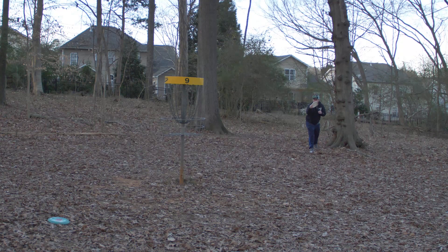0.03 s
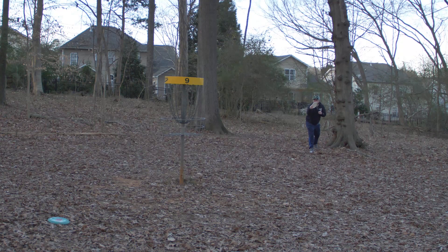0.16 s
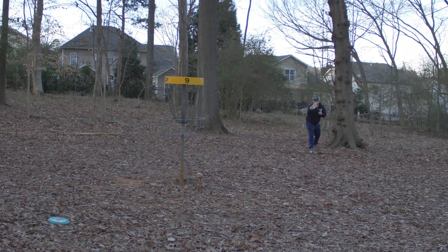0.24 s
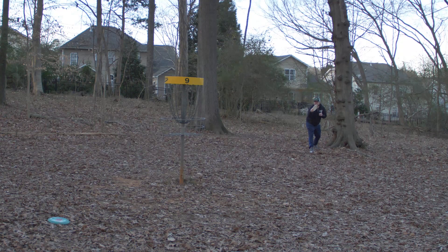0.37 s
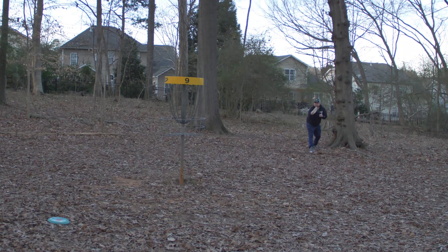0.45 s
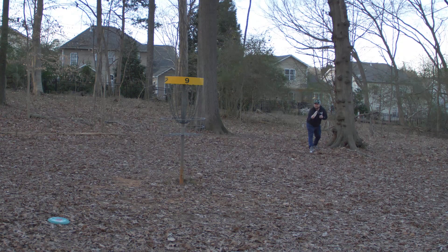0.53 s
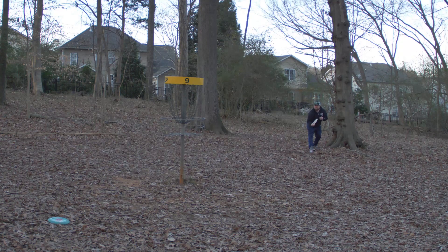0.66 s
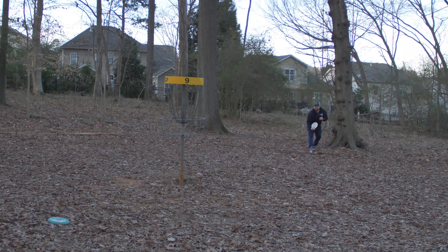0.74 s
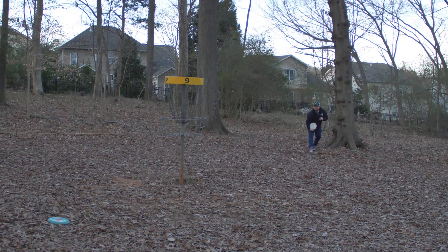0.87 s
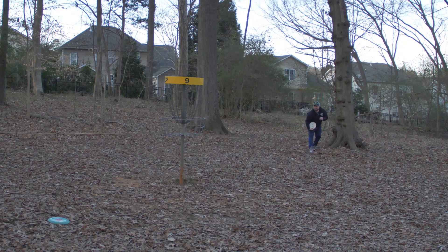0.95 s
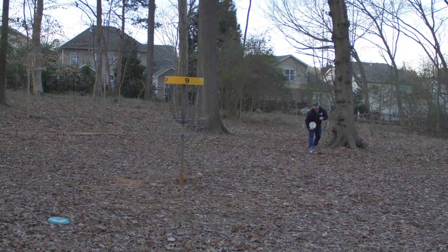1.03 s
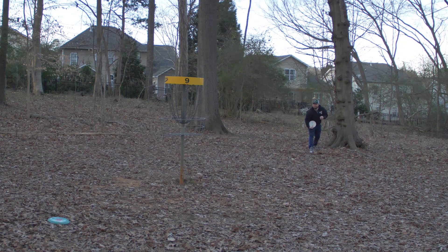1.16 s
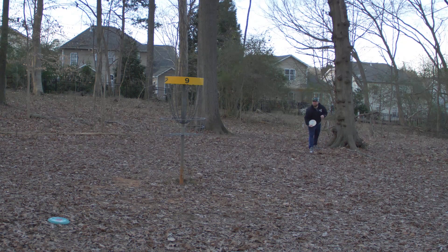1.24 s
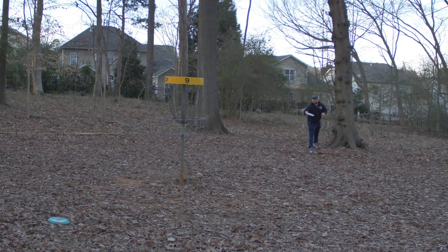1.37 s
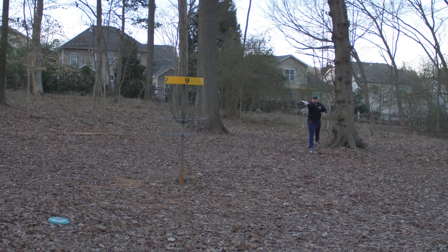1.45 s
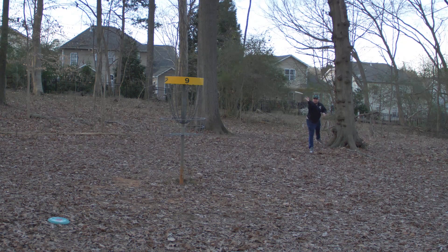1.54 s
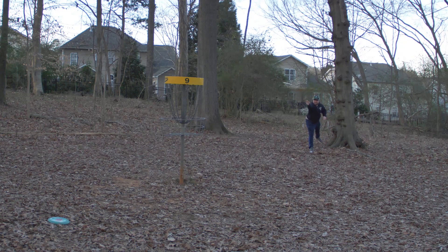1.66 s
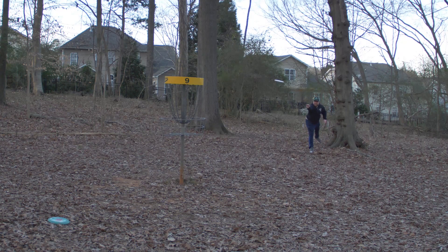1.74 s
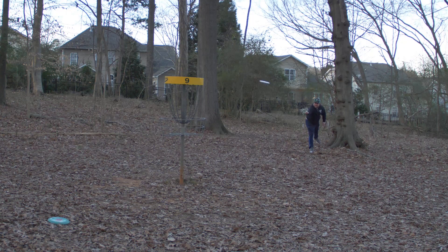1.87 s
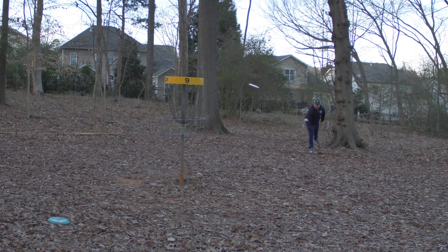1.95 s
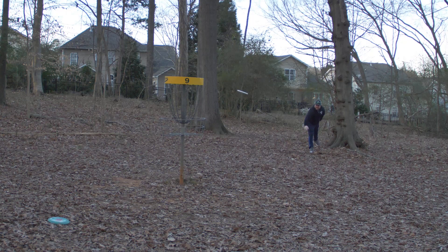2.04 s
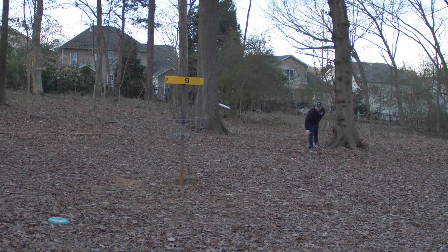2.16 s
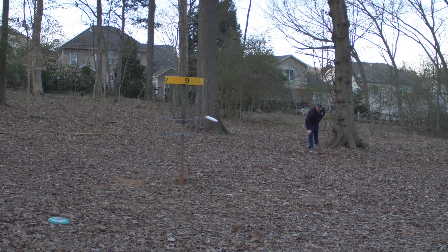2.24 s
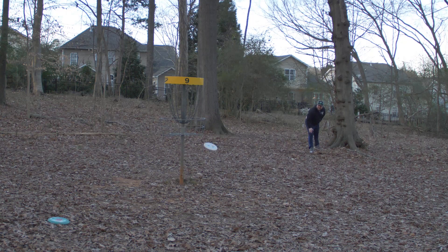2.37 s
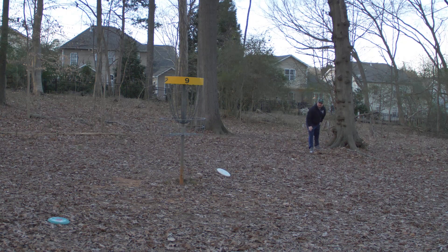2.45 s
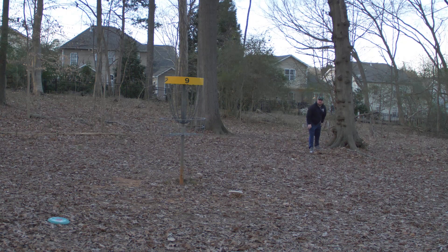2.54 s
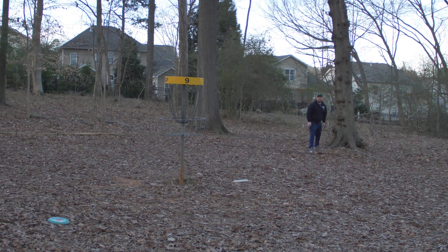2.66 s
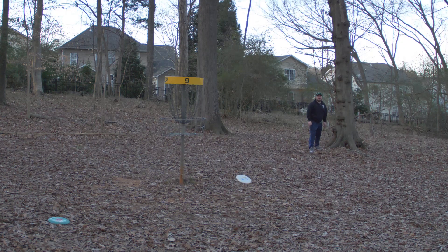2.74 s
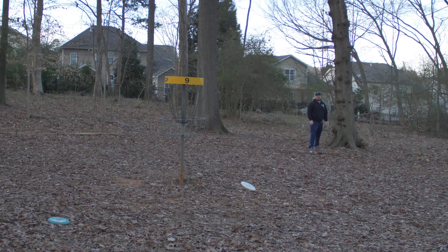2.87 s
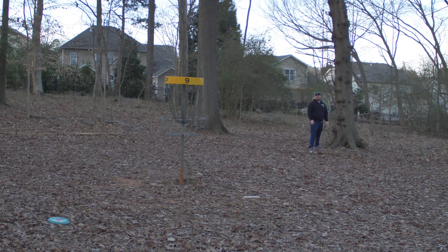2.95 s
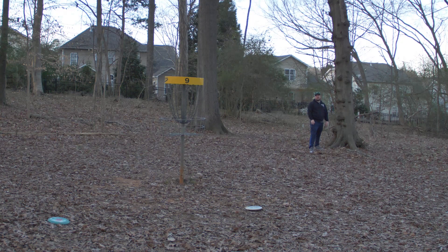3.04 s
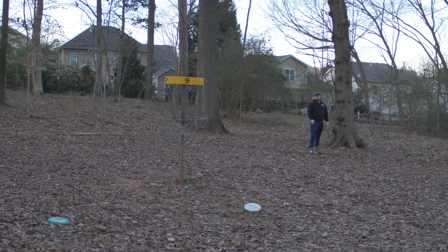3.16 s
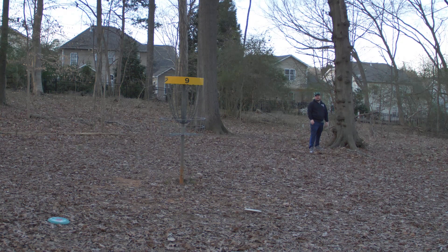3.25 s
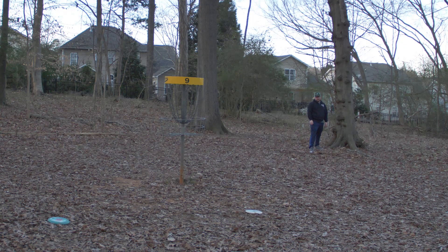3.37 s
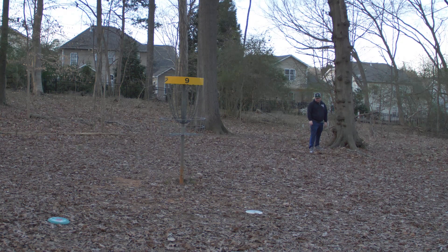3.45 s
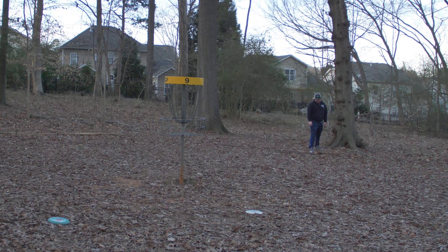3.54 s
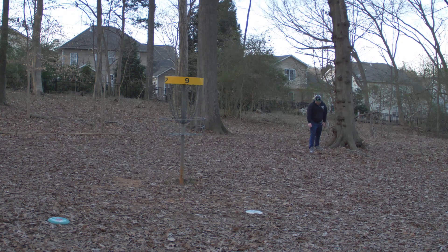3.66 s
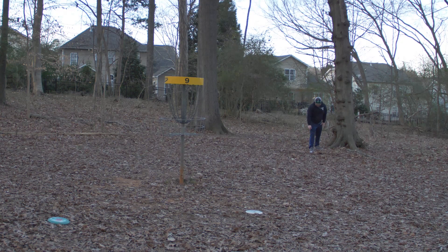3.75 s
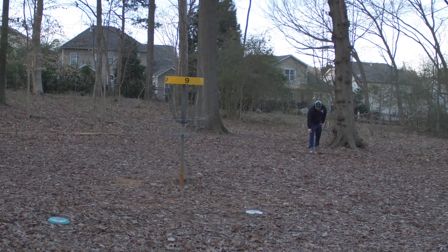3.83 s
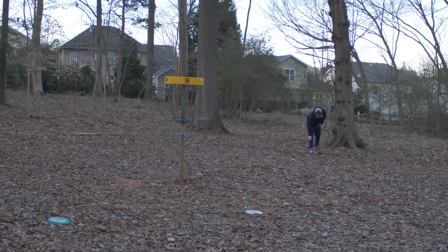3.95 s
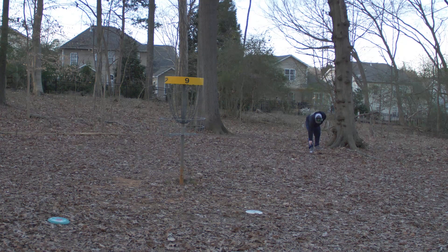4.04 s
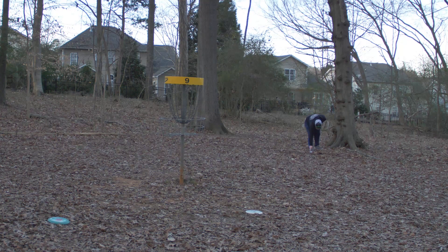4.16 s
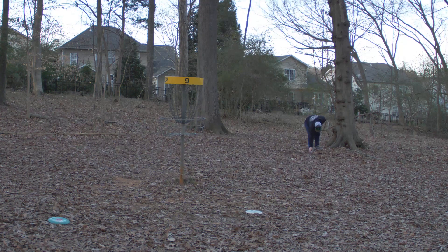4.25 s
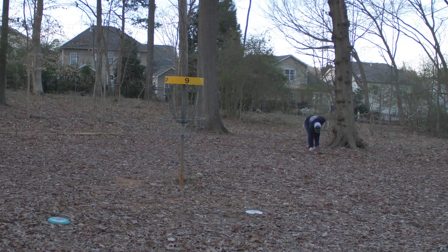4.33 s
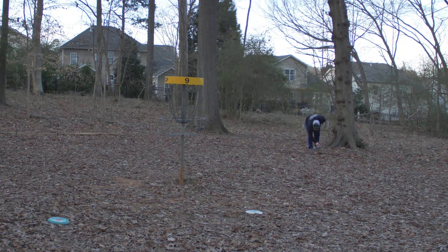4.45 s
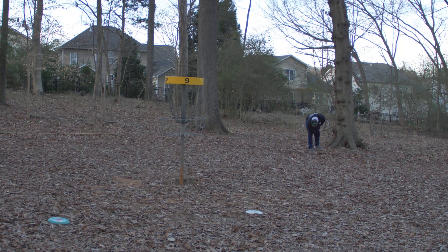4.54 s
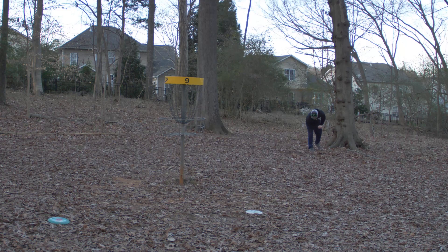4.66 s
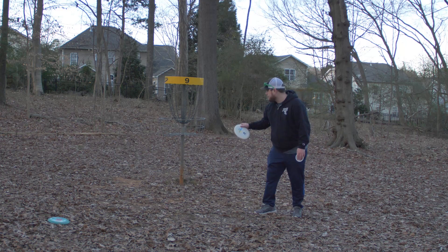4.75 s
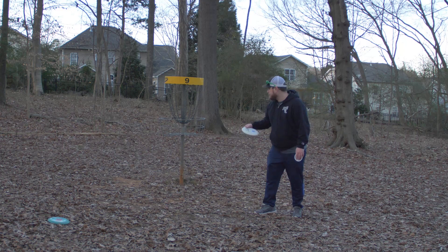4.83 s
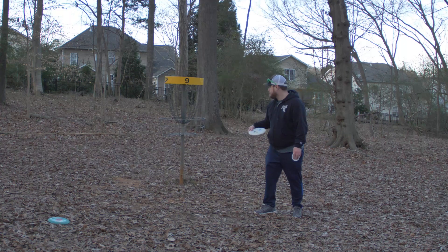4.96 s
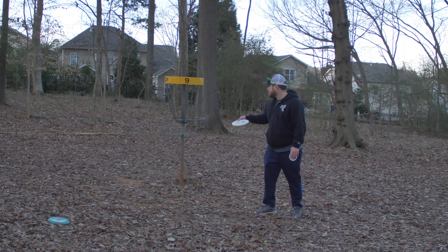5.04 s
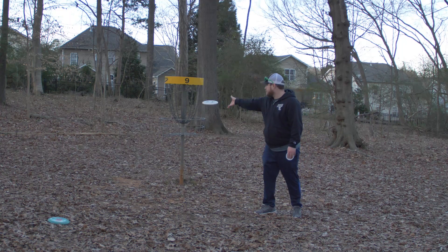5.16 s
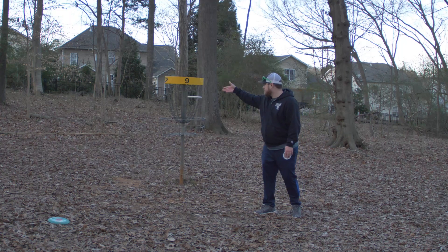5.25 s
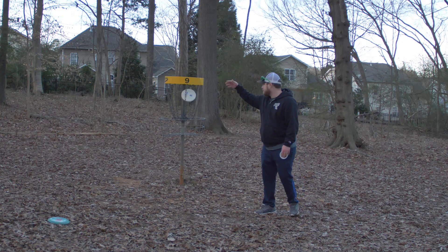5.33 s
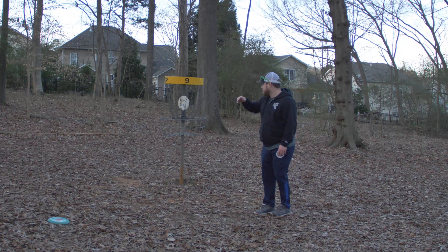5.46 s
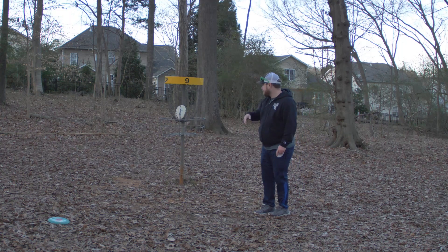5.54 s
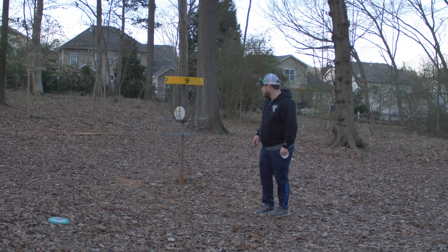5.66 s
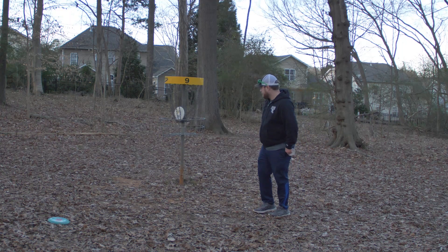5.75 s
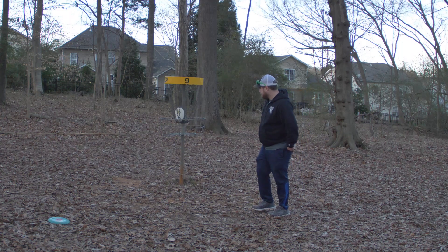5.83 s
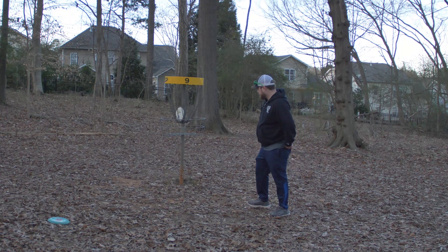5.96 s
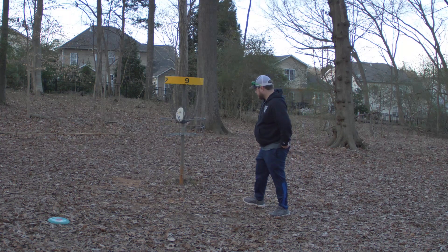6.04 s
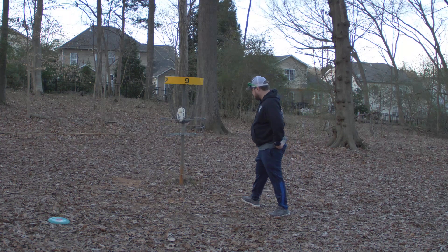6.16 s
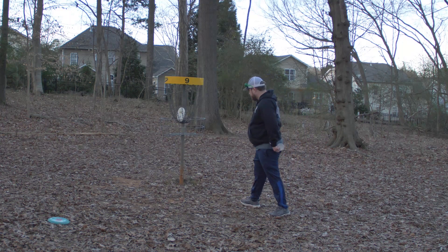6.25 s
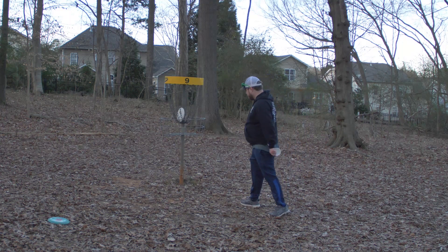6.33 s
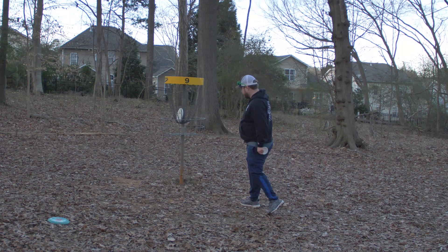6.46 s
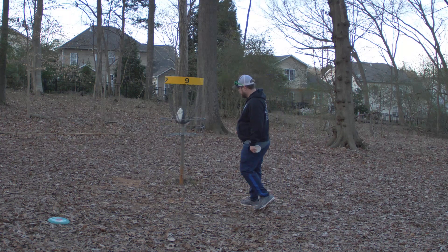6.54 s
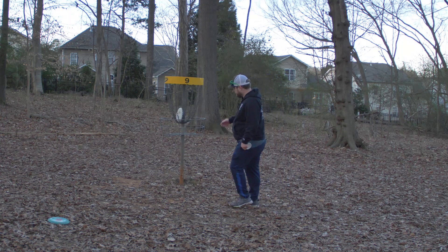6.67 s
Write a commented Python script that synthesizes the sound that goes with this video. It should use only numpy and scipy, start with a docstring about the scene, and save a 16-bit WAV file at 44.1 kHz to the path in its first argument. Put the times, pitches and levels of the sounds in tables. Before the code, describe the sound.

In a quiet wooded suburb with faint far traffic hum, feet stir dry leaves and twigs snap. A thrown disc clangs off a steel basket, chains shiver, and the disc knocks and flops on leaves. After more twig snaps, a second disc crashes much louder into the chains, jingling and clinking to rest. Microphone close to the basket.

```python
"""A suburb hums far off while feet stir dry leaves and twigs snap. A putted disc clangs off a steel disc golf basket,
leaves the chains shivering and bounces away over the ground. A second disc crashes into the chains, which jingle
while it settles. Steel is decaying modes set off by volleys of contacts; leaves are coloured crackle; twigs and
shivering chains are resonated noise or contacts; the disc is short sines with a slap; the hum is coloured noise."""
import sys
import numpy as np
from scipy import signal
from scipy.fft import rfft, irfft
from scipy.io import wavfile
from scipy.ndimage import uniform_filter1d

SR = 44100
rng = np.random.default_rng(int(sys.argv[2]) if len(sys.argv) > 2 else 0)


def wrap_up_sound(samples):
    """Save the sound to the file named by the first command line argument, as 16-bit audio."""
    columns = np.atleast_2d(samples).T
    # keep every value between -1 and 1, then stretch to whole-number steps
    tamed = np.clip(columns, -1, 1)
    steps = np.round(tamed * 32767).astype(np.int16)
    wavfile.write(sys.argv[1], SR, steps)


N = 295470
T = np.arange(N) / SR
BLOCK = 256
RING_T = np.arange(BLOCK * BLOCK) / SR  # time axis of one struck sound, s


def undb(db):
    """Gain of a level in dB."""
    return 10 ** (np.asarray(db) / 20)


def unit(x):
    """Scale to rms 1."""
    return x / np.sqrt(np.mean(x ** 2))


def add(out, s, x):
    """Mix x into out from time s."""
    i = int(s * SR)
    out[i:i + len(x)] += x[:N - i]


def shape(points, hz, tilt_db=0):
    """Gain of a (Hz, dB) spectrum at hz, tilted about 3 kHz by tilt_db per octave."""
    f, db = np.transpose(points)
    octave = np.log2(np.maximum(hz, 1))
    level_db = np.interp(octave, np.log2(f), db)
    return undb(level_db + tilt_db * np.clip(octave - np.log2(3000), -3, 3))


def colour(x, points, tilt_db=0):
    """Give x a spectrum; rms 1."""
    gain = shape(points, np.fft.rfftfreq(len(x), 1 / SR), tilt_db)
    return unit(irfft(rfft(x) * gain, len(x)))


def resonate(x, modes):
    """Pass x through (Hz, width Hz, dB) resonances with steep skirts; rms 1."""
    f = np.fft.rfftfreq(len(x), 1 / SR)
    power = sum(undb(db) ** 2 / (1 + ((f - hz) / width) ** 2) ** 2 for hz, width, db in modes)
    return unit(irfft(rfft(x) * np.sqrt(power), len(x)))


def contacts(rate, spread_db, size):
    """Tiny collisions at random moments, rate a second, of uneven strength."""
    chance = rng.random(size)
    strength = rng.standard_normal(size)
    sign = rng.choice([-1, 1], size)
    return (chance < rate / SR) * sign * undb(spread_db * strength)


def ring(modes, scatter_db=2, detune=0.):
    """Free decay of (Hz, dB, t60 s) modes, starting at rms 1; each strike shares the energy differently."""
    hz, db, t60 = np.transpose(modes)
    gain = undb(db + scatter_db * rng.standard_normal(len(hz)))
    gain = gain / np.sqrt(np.sum(gain ** 2) / 2)
    gain = gain * np.exp(2j * np.pi * rng.random(len(hz)))  # random phase
    hz = hz * (1 + detune * rng.standard_normal(len(hz)))
    pole = 2j * np.pi * hz - np.log(1000) / t60
    # each block of samples starts from the state that the modes have decayed to
    block_start = gain * np.exp(np.outer(RING_T[::BLOCK], pole))
    within_block = np.exp(np.outer(pole, RING_T[:BLOCK]))
    return (block_start @ within_block).imag.ravel()


def burst(t, rise, fade):
    """Quick rise and exponential fade, both time constants in s."""
    return (1 - np.exp(-t / rise)) * np.exp(-t / fade)


def walk(rate):
    """Slow random wander, spread near 1, with rate new targets a second."""
    k = int(SR / rate)
    steps = np.repeat(rng.standard_normal(N // k + 1), k)
    return 1.3 * uniform_filter1d(uniform_filter1d(steps, k), k)[:N]


def arch(start, length, power=1.0):
    """Gain that rises and falls once, as half a sine raised to power."""
    return np.maximum(np.sin(np.pi * np.clip((T - start) / length, 0, 1)), 0) ** power


def run_down(start, rise, length, power, rise_power=1):
    """Gain of a motion that builds up, then is braked to a standstill by friction; power bends the run-down."""
    t = T - start
    build_up = np.sin(np.pi / 2 * np.clip(t / rise, 0, 1)) ** rise_power
    return build_up * np.clip((length - t) / (length - rise), 0, 1) ** power


# spectrum of the far hum: f/Hz, level/dB
HUM_SPECTRUM = [(25, -0.5), (50, -4.5), (85, 1.5), (125, -4), (200, -7.5), (320, -5), (580, -0.5),
                (1100, -4.5), (2000, -16.5), (4000, -30), (5500, -27.5), (11500, -32), (15400, -31)]


def suburb(base_db=-50.5, swell_db=3, swell_s=2.4, swell_length_s=1.94):
    """Far traffic: coloured noise that wavers a little and swells once."""
    db = base_db + swell_db * arch(swell_s, swell_length_s) + 0.47 * walk(7.2)
    return colour(rng.standard_normal(N), HUM_SPECTRUM) * undb(db)


# spectrum of crackling dry leaves: f/Hz, level/dB
LEAF_SPECTRUM = [(300, -7), (1000, 0), (2500, -5.5), (4000, -2), (6000, -3), (8500, -10.5), (10500, -7.5),
                 (13000, -14), (15500, -27.5)]
# a foot presses or turns in the leaves: t/s, length/s, level/dB
FOOTSTEPS = [(.43, .34, -58), (1.166, 0.48, -60), (1.68, .34, -61.5), (4.28, 0.35, -56), (4.64, 0.27, -50),
             (4.793, .6, -59.5), (6.468, 0.18, -43.5)]


def leaves_underfoot(rustle_db=-69):
    """Uneven tiny contacts crackle with the pressure of the feet, over a constant faint rustle."""
    power = undb(rustle_db) ** 2
    for s, length, db in FOOTSTEPS:
        power = power + (undb(db) * arch(s, length, power=0.62)) ** 2
    return colour(contacts(3000, 6, size=N), LEAF_SPECTRUM) * np.sqrt(power)


def trees(x, t60=1.0, echo_db=-21):
    """Trunks and houses scatter a faint, dull echo: x convolved with fading coloured noise."""
    echo_spectrum = [(100, -2.5), (600, -8), (3000, -6), (8000, -1), (15000, -24.5)]  # f/Hz, level/dB
    echo = colour(rng.standard_normal(len(RING_T)), echo_spectrum)
    echo = echo * burst(RING_T, 0.0097, t60 / np.log(1000))
    return undb(echo_db) * signal.fftconvolve(x, echo / np.sqrt(np.sum(echo ** 2)))[:N]


# twigs snapping underfoot: t/s, level/dB, resonance f/Hz
TWIG_SNAPS = [(0.5496, -33.5, 580), (.551, -37, 2800), (.66, -41, 5000), (1.043, -39, 2720),
              (4.342, -36, 6500), (4.434, -41.5, 5000), (4.537, -34, 3600), (4.886, -35.5, 5470),
              (4.954, -40, 6500), (5.105, -30, 4150), (5.283, -34, 6000)]


def twigs():
    """A snap is noise through one broad resonance: a crack that is shorter the higher it is, and a faint tail."""
    out, t = np.zeros(N), RING_T[:8192]
    for s, db, hz in TWIG_SNAPS:
        crack = resonate(rng.standard_normal(len(t)), [(hz, 0.63 * hz, 0)])
        fade = np.exp(-t * hz / 4) + 0.048 * np.exp(-t / 0.014)
        add(out, s, undb(db) * crack * fade)
    return out


# broad resonances of the taut chains: f/Hz, width/Hz, level/dB
TAUT_CHAIN_MODES = [(330, 7.3, 2), (468, 110, -7.5), (860, 180, -1), (1470, 370, -10.5), (1890, 120, -9.5),
                    (2364, 21, -5.5), (2696, 122, 1.5), (3600, 160, 1), (4380, 250, -11), (4800, 310, -10),
                    (5580, 180, -12), (6360, 390, -18), (7240, 220, -19), (9780, 900, -26.5)]


def shiver(start=2.386, level_db=-33, slack_share=.15, taut_s=.14, count=3):
    """Hanging chains chatter finely as the frame is struck, swelling in turn until friction stops them."""
    chatter = 0
    for size in 1 + .012 * np.linspace(-1, 1, count):
        modes = [(hz * size, width, db) for hz, width, db in TAUT_CHAIN_MODES]
        chatter = chatter + resonate(contacts(1800, 2, size=N), modes) * undb(1.2 * walk(8.9))
    strength = run_down(start, rise=0.32, length=1.27, power=1.41, rise_power=1.6)
    # the resonances start low, climb as the chains pull taut, and bend slowly as they sway
    slack = slack_share * np.exp(-np.maximum(T - start, 0) / taut_s)
    read_position = np.cumsum(1 - slack + .006 * walk(5))
    return np.interp(read_position, np.arange(N), unit(chatter)) * undb(level_db) * strength


def rods(count=360, t60_at_2khz=0.63, damping=0.68):
    """The basket's many rods, packed closer at low pitch; higher ones decay faster. Returns Hz and t60 in s."""
    hz = 380 + 13500 * ((np.arange(count) + rng.random(count)) / count) ** 1.6
    t60 = t60_at_2khz * (hz / 2000) ** -damping * np.exp(0.36 * rng.standard_normal(count))
    return hz, t60


# spectrum of steel contacts, which also weights the rods: f/Hz, level/dB
CLATTER_SPECTRUM = [(150, -32), (300, -24), (450, -10), (800, -7.5), (1400, -3.5), (2000, -2.5), (3300, 0),
                    (4100, -2.5), (5400, 1), (7500, -8.5), (10000, -8.5), (11000, -12.5), (13000, -9),
                    (15500, -22.5)]
# strongest modes of the welded frame: f/Hz, level/dB, t60/s
FRAME_MODES = [(567, -4, 0.34), (990, -7.5, .5), (1030, 1, 0.34), (1449, -0.5, .45), (1740, 3, 0.39),
               (1900, 2.5, 0.39), (1916, 0, 0.57), (2090, 0, 0.32), (2346, 6, 0.27), (2901, -4.5, 1),
               (2980, -3, .5), (3182, -3, .5), (3300, -12, .35), (3740, -4, 0.19), (4310, -2.5, .3)]
# steel hoop that gathers the chains; close pairs beat: f/Hz, level/dB, t60/s before the chains choke it
HOOP_MODES = [(2920, -22.5, 2.1), (2955, -17.5, 0.99), (4590, -5, 0.31), (4652, 0, 0.63), (4700, -3, 0.88),
              (4740, -8, 0.72), (4845, -7, .3), (5000, -12, .3), (5110, -13, .3), (5410, -14.5, 0.39),
              (5670, -13, 0.19), (6131, -17.5, .3), (6860, -21, 0.54), (7220, -14.5, .3), (8870, -25, .3),
              (9250, -20, .3), (12940, -12, .25), (12894, -6, .3), (13119, -16, 0.2)]


def blow(db, fade, hoop_db, struck_hz, clank_db, frame_db, full_tilt_db, rod_hz, rod_t60):
    """A volley of steel contacts sets rods, frame and chain hoop ringing; harder blows are brighter."""
    t = RING_T
    tilt_db = full_tilt_db + 0.1154 * db  # per octave
    clatter = colour(contacts(5000, 1.9, size=len(t)), CLATTER_SPECTRUM, tilt_db) * burst(t, 0.00083, fade)
    # the rod under the disc rings briefly, in a close pair of bending modes
    clank = ring([(.985 * struck_hz, 0, 1), (1.02 * struck_hz, -5, 1)]) * burst(t, 0.00063, 0.0098)
    rod_db = 20 * np.log10(shape(CLATTER_SPECTRUM, rod_hz, tilt_db + 3.0))
    frame = ring(np.c_[rod_hz, rod_db, rod_t60], scatter_db=0.5)
    frame = frame + undb(-2) * ring(FRAME_MODES, scatter_db=1.5)
    # a longer volley feeds more into the frame
    frame = frame * undb(db + frame_db) * fade / .018
    # a dull blow reaches less of the hoop's top modes
    hoop_hz, mode_db, hoop_t60 = np.transpose(HOOP_MODES)
    dull_db = 3 * min(tilt_db, 0) * np.log2(np.maximum(hoop_hz / 4600, 1))
    hoop = ring(np.c_[hoop_hz, mode_db + dull_db, hoop_t60], scatter_db=2.5, detune=0.00047)
    # the chains fall back on the hoop and choke most of its ring
    free_share = 0.26
    hoop = hoop * (free_share + (1 - free_share) * np.exp(-t / 0.043))
    steel = (frame + undb(hoop_db) * hoop) * (1 - np.exp(-t / 0.0021))
    return undb(db) * clatter + undb(clank_db) * clank + steel


# the first disc clangs off the frame:
# t/s, clatter level/dB, fade/s, hoop level/dB, struck rod f/Hz, rod level/dB
FRAME_CLANGS = [(2.3949, -15.5, 0.023, -30, 1910, -16.5), (2.3992, -18.5, 0.0083, -22, 2955, -8.5),
                (2.415, -25.5, .02, -29, 1940, -18.5), (2.455, -27.5, 0.018, -36, 1870, -20.5)]
# the second disc crashes into the chains and drops into the tray: same columns
CHAIN_CRASHES = [(5.3076, -8.5, 0.027, -27, 1824, -10), (5.328, -23, .017, -23, 2110, -11),
                 (5.344, -22, 0.023, -14, 1477, -20), (5.387, -10.5, 0.011, -8, 2902, -14),
                 (5.3918, -3, 0.011, -19, 2940, -8), (5.402, -5, 0.007, -2.5, 2363, -6),
                 (5.452, -14, 0.011, -12.5, 2930, -21), (5.597, -12, 0.018, -17, 4660, -7),
                 (5.622, -18, 0.027, -16.5, 2040, -22), (5.7141, -15.5, 0.021, -20, 3510, -17.5),
                 (5.934, -36, 0.03, -37, 3300, -46), (6.056, -31, 0.0043, -54, 3000, -36),
                 (6.3858, -25.5, 0.013, -22, 1960, -24)]


def basket():
    """Both discs strike the same set of rods, with their own frame level and brightness."""
    out = np.zeros(N)
    rod_hz, rod_t60 = rods()
    # frame level against the clatter for an 18 ms fade (dB), tilt at full force (dB per octave)
    for blows, frame_db, full_tilt_db in [(FRAME_CLANGS, -5.5, -0.5), (CHAIN_CRASHES, -16, 1.56)]:
        for s, *strike in blows:
            add(out, s, blow(*strike, frame_db, full_tilt_db, rod_hz, rod_t60))
    return out


# the plastic disc knocks on earth or steel: t/s, relative level/dB, plate f/Hz
DISC_KNOCKS = [(2.398, -23.5, 361), (2.612, 3, 762), (2.637, -17.5, 830), (3.1153, -16, 680),
               (3.141, -25.5, 645), (5.439, -17.5, 670), (5.4406, -13.5, 1360), (5.736, -22, 895),
               (5.804, -25.5, 730), (6.187, -30, 1420)]


def disc(fade=0.0017, slap_db=-7, thump_db=-42):
    """A knock: a few cycles of the plastic plate, a sharp slap of the rim and a low thump."""
    out, t = np.zeros(N), RING_T[:4096]
    slap_modes = [(2085, 700, 8.0), (4500, 3000, -16)]  # f/Hz, width/Hz, level/dB
    for s, db, hz in DISC_KNOCKS:
        plate = 2 * np.sin(2 * np.pi * hz * t) * burst(t, 0.00061, fade)
        slap = resonate(rng.standard_normal(len(t)), slap_modes) * burst(t, .0001, 0.00098)
        thump = np.sin(2 * np.pi * 160 * t) * burst(t, 0.0007, 0.015)
        add(out, s, undb(db) * (plate + undb(slap_db) * slap + undb(thump_db) * thump))
    return out


# the disc bounces and flops on dry leaves: t/s, level/dB, fade/s
LEAF_CRUNCHES = [(2.593, -23.5, 0.014), (3.09, -29.5, 0.007), (3.112, -32.5, 0.0091), (3.138, -37, 0.014),
                 (3.211, -46.5, .022), (3.328, -41.5, 0.023), (3.364, -42.5, 0.034), (3.629, -46.5, .004)]


def disc_on_leaves():
    """Each landing is a short fading burst of leaf crackle."""
    out, t = np.zeros(N), RING_T[:8192]
    for s, db, fade in LEAF_CRUNCHES:
        crackle = colour(contacts(4000, 2.5, size=len(t)), LEAF_SPECTRUM)
        add(out, s, undb(db) * crackle * burst(t, 0.00059, fade))
    return out


# the chains swing together and bunch: t/s, length/s, jingle level/dB, scrape level/dB
CHAIN_SWINGS = [(5.307, .22, -22, -40), (5.482, 0.14, -41, -32), (5.597, 0.22, -29, -35.5),
                (6.173, 0.34, -36.5, -40)]


def chain_motion(sway_jingle_db=-42, sway_scrape_db=-42.5):
    """Strength of jingle and scrape: swings on top of a sway that friction stops."""
    sway = run_down(start=5.31, rise=.05, length=1.46, power=0.47)
    jingle, scrape = undb(sway_jingle_db) * sway, undb(sway_scrape_db) * sway
    for s, length, jingle_db, scrape_db in CHAIN_SWINGS:
        swing = arch(s, length, power=0.65)
        jingle = np.hypot(jingle, undb(jingle_db) * swing)
        scrape = np.hypot(scrape, undb(scrape_db) * swing)
    return jingle, scrape


# chain links ringing freely, before each sound's own fade: f/Hz, level/dB, t60/s
LINK_MODES = [(11630, -2, 0.27), (11730, 2, 0.23), (11740, 7.5, 0.21), (12270, -4, 0.18),
              (12300, 4.5, 0.31), (12800, -9, .2), (12760, -4.5, 0.23), (12880, -3, 0.19),
              (13450, -1.5, 0.18), (13800, -20, 0.16), (14500, -20, .1)]
# spectrum of links scraping and ticking: f/Hz, level/dB
SCRAPE_SPECTRUM = [(200, -31), (500, -6.5), (1400, 1.5), (2100, 3), (2500, -11), (3500, 6), (4200, -3.5),
                   (5500, -2.5), (8000, -12.5), (10000, -6), (11000, -11), (12500, -17), (14000, -14),
                   (15500, -19)]


def swinging_chains(rattle_db=-2, count=8):
    """Links of slightly different size jingle and scrape, and each chain rattles a rod it hangs from."""
    jingle, rattle = np.zeros(N), np.zeros(N)
    for _ in range(count):
        link = ring(LINK_MODES, scatter_db=5.5, detune=0.00515) * burst(RING_T, 0.0036, 0.034)
        jingle += signal.fftconvolve(contacts(12, 2.6, size=N), link)[:N]
        rod_modes = [(hz, 0, .2) for hz in rng.uniform(1299, 4000, size=7)]
        rod = ring(rod_modes) * burst(RING_T, 0.0011, 0.069)
        rattle += signal.fftconvolve(contacts(24, 5.5, size=N), rod)[:N]
    scrape = colour(contacts(1400, 3.0, size=N), SCRAPE_SPECTRUM) + undb(rattle_db) * unit(rattle)
    jingle_gain, scrape_gain = chain_motion()
    return jingle_gain * unit(jingle) + scrape_gain * unit(scrape)


# single links clinking: t/s, relative level/dB, strongest ring f/Hz
LINK_CLINKS = [(5.329, -22, 11700), (5.397, -8.5, 13100), (5.59, -23, 12200), (5.69, -25.5, 11800),
               (5.707, -21.5, 13100), (5.732, -24, 12200), (5.768, -24.5, 11900), (5.787, -26.5, 11800),
               (5.854, -33, 12900), (5.932, -26.5, 13100), (6.218, -34.5, 13000), (6.258, -25.5, 12800),
               (6.3143, -23.5, 11600), (6.361, -25.5, 12200)]


def clinks(tick_db=-15, focus_hz=350):
    """Where a link is touched decides which of its modes speak; a bright tick of contacts starts each clink."""
    out, t = np.zeros(N), RING_T
    hz, link_db, t60 = np.transpose(LINK_MODES)
    for s, db, ring_hz in LINK_CLINKS:
        # modes lose 3 dB for each focus_hz away from the strongest ring
        modes = np.c_[hz, link_db - 3 * np.abs(hz - ring_hz) / focus_hz, t60]
        link = ring(modes, scatter_db=6, detune=0.0045) * burst(t, 0.0044, 0.022)
        tick = colour(contacts(1000, 2.6, size=len(t)), SCRAPE_SPECTRUM, tilt_db=8)
        tick = tick * burst(t, 0.0015, 0.019)
        add(out, s, 2 * undb(db) * (link + undb(tick_db) * tick))
    return out


def scene():
    """Nearby sounds with their echo from the trees, over the far suburb."""
    ground = leaves_underfoot() + twigs() + disc_on_leaves()
    steel = shiver() + basket() + swinging_chains() + clinks()
    near = ground + steel + disc()
    return (near + trees(near) + suburb())[None]


def record(dry, low_cut_hz=65, top_hz=15700):
    """Peaks past full scale are clipped; then the deepest bass and the top are cut."""
    low_cut = signal.butter(2, low_cut_hz, "high", fs=SR, output="sos")
    top_cut = signal.ellip(8, .2, 70, top_hz, fs=SR, output="sos")
    clipped = np.clip(dry, -1, 1)
    return signal.sosfilt(top_cut, signal.sosfilt(low_cut, clipped))


dry = scene()
out = record(dry)
wrap_up_sound(out)
```